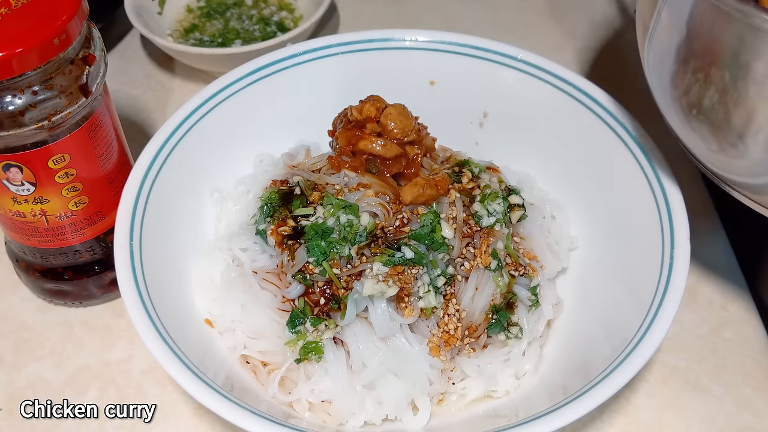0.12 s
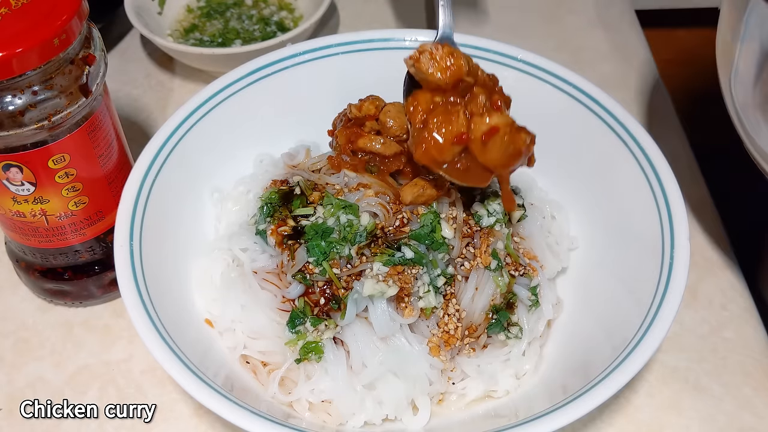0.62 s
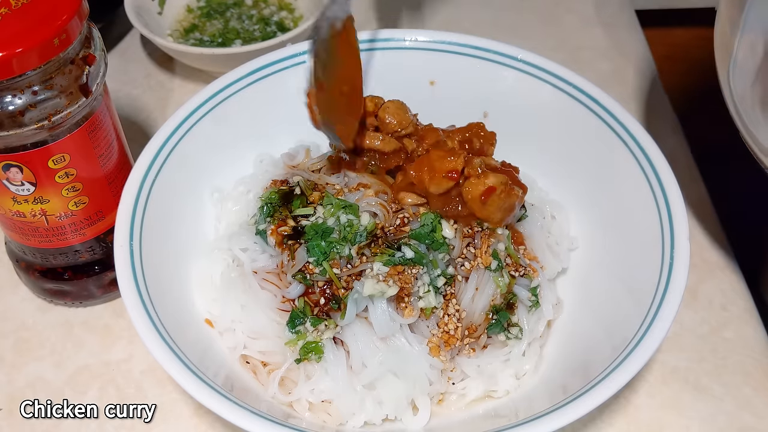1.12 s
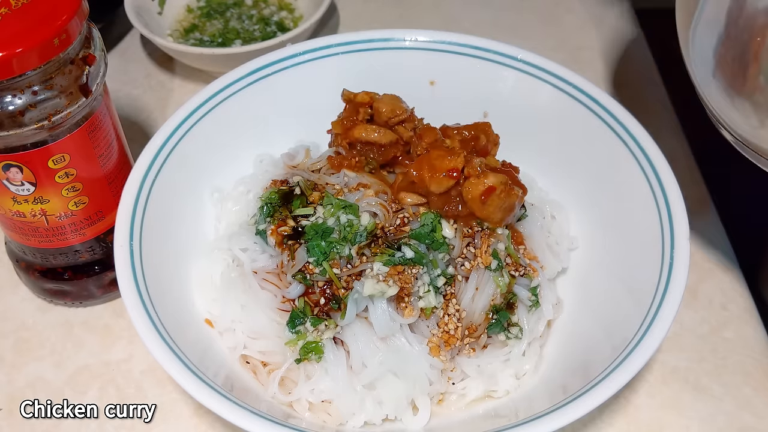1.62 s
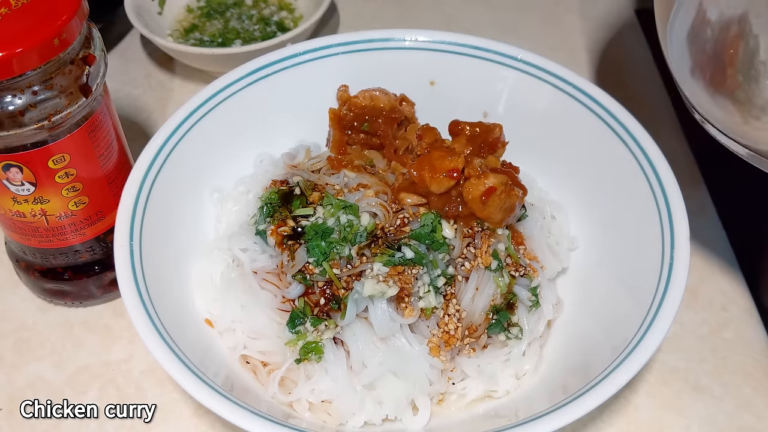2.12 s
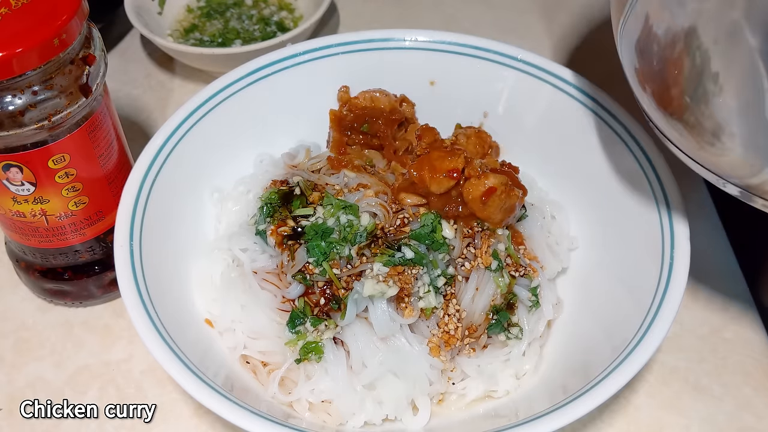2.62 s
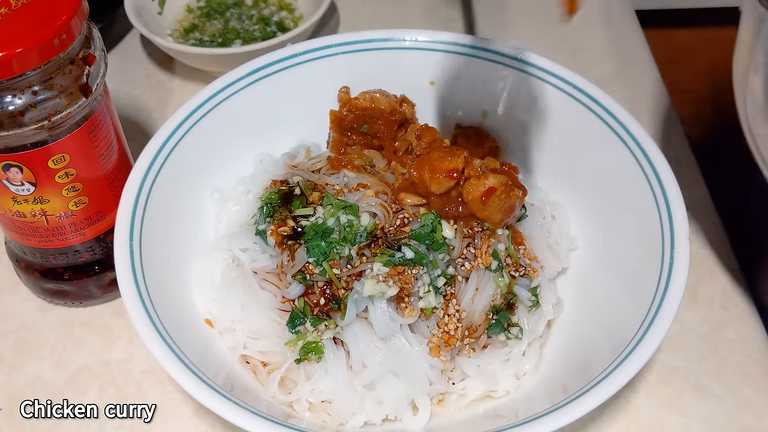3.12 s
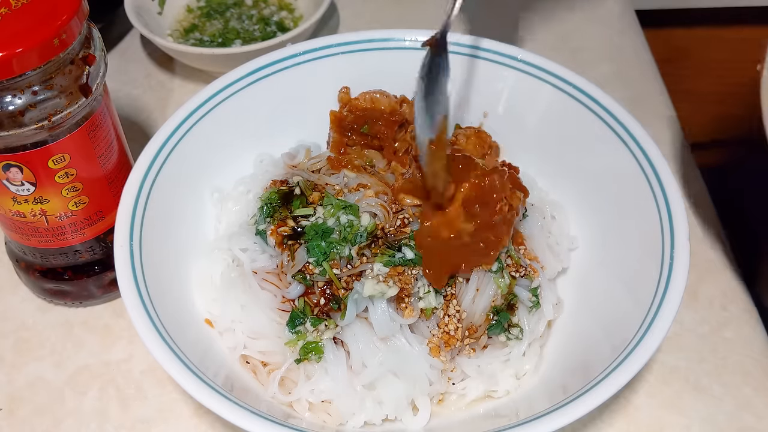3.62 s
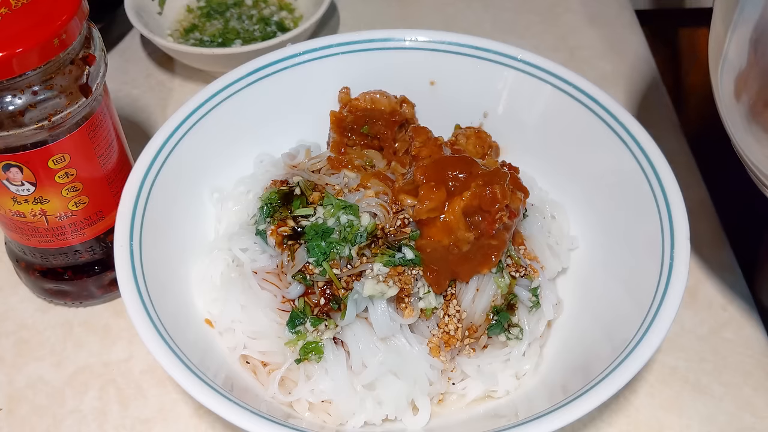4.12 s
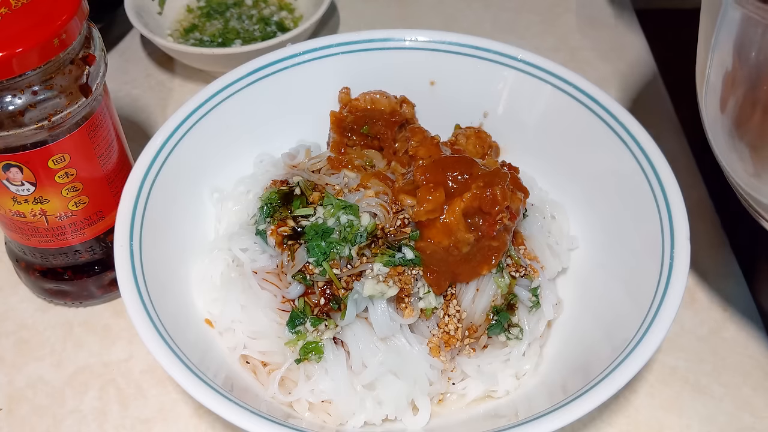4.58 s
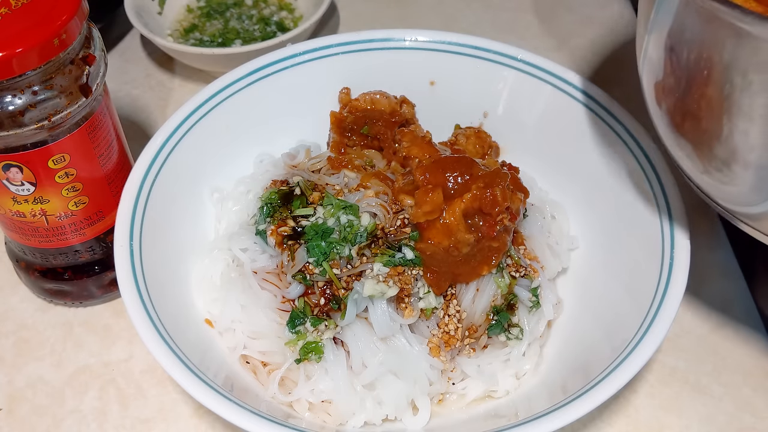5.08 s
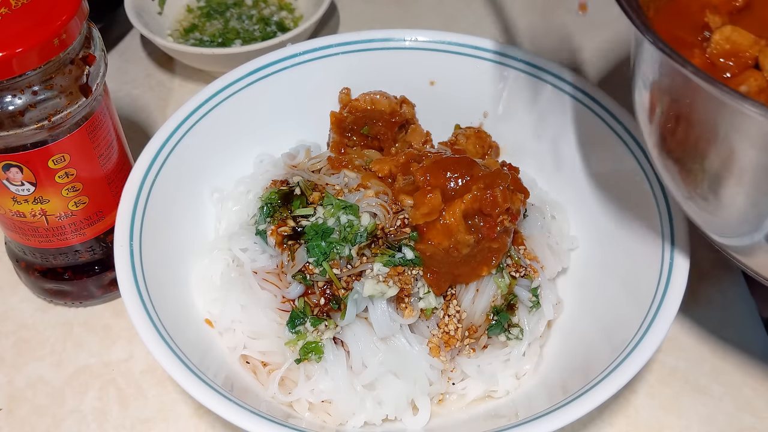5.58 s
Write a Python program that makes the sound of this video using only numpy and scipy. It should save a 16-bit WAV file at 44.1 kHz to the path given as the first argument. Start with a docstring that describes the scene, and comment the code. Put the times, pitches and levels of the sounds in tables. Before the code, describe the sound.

In a small kitchen a quiet extractor fan hums steadily throughout. Faint, crisp ticks of sauce and fingers come irregularly. A steel spoon knocks sharply into a pot of thick stew and scrapes briefly along the bottom; much later a softer knock hits the wall with a fainter scrape. Close stereo microphones, short room reverberation.

```python
"""A small kitchen: an extractor fan hums through its duct while sauce and hands tick faintly.
Twice a steel spoon is knocked into a steel pot of thick stew and dragged along it.
Knocks are decaying sine modes plus clatter; drags are grainy noise in the same modes;
ticks are band-limited snaps with wet fizz; the fan is noise through duct resonances.
Two spaced microphone ports listen."""
import sys
import numpy as np
from scipy import signal
from scipy.fft import rfft, irfft, next_fast_len
from scipy.io import wavfile
from scipy.ndimage import map_coordinates

SR = 44100
rng = np.random.default_rng(int(sys.argv[2]) if len(sys.argv) > 2 else 0)


def gain_from_decibels(decibels):
    """Convert decibel values to linear amplitude factors."""
    exponent = np.asarray(decibels, float) / 20
    return 10 ** exponent


def wav_out(sig):
    """Save sig, one row per channel (or a flat mono array), as 16-bit PCM at SR to the path in sys.argv[1]."""
    wavfile.write(sys.argv[1], SR, np.round(np.clip(np.atleast_2d(sig).T, -1, 1) * 32767).astype(np.int16))


N = 252192

# Modes of pot and spoon, damped by the stew. Each row: frequency in Hz, t60 in s, then relative level in dB
# when struck on the bottom, struck on the wall, rubbed on the bottom, rubbed on the wall.
POT_MODES = [(659.7, 0.045, -38, -59, -26.5, -28), (757, .07, -45.5, -48.5, -26.5, -24),
             (880, 0.05, -36, -55, -27.5, -27), (1393, .035, -29, -55.5, -25, -23),
             (2217.5, 0.14, -29.5, -41.5, -17.5, -19), (2370, 0.062, -42, -44, -15.5, 2.5),
             (2990, .2, -30.5, -39, -9, -1), (3503, 0.1, -25, -59, -11.5, -14),
             (3705, 0.099, -34.5, -50, -7, -6), (3950, .14, -26, -51, -6, -3),
             (4070, .11, -24, -31, -4, -3), (4420, .15, -27, -49, -8, -6),
             (4670, 0.17, -26, -55, -12, -2.5), (5090, 0.1, -31, -45, -13, -7),
             (5226, 0.098, -27.5, -43, -11.5, -4), (6570, .09, -29, -55, -0.5, -9),
             (6880, 0.039, -27, -66, -10, -16), (7040, .09, -23.5, -71, -7.5, -15),
             (7310, 0.0993, -33.5, -51, -1, -5), (7770, .13, -28, -47, -12.5, -11.5),
             (8340, .11, -25.5, -71, -16, -15), (8750, 0.12, -29.5, -70, -15.5, -13.5),
             (9280, 0.2, -38, -47, -11, -7), (10366, .11, -35.5, -48, 1, -6),
             (10880, .1, -26, -53, -4.5, -8), (11100, .1, -26, -58, -10, -12),
             (11500, 0.11, -24, -58, -6, -14), (11500, .09, -26.5, -64, -7, -14),
             (13910, .09, -33.5, -65, -14, -12), (14800, .1, -31.5, -66, -12, -13.5)]
# Kinds of contact, in the order of the level columns above.
CONTACT_KINDS = ["bottom", "wall", "bottom rubbed", "wall rubbed"]


def unit(x):
    """Scaled to rms 1 over all channels together."""
    return x / np.sqrt(np.mean(x ** 2) + 1e-20)


def along(points, hz):
    """Each column of (Hz, ..) points interpolated on a log frequency axis."""
    point_hz, *columns = np.transpose(points)
    return np.squeeze([np.interp(np.log(hz + 1), np.log(point_hz + 1), c) for c in columns])


def filtered(x, response):
    """x times a response of frequency."""
    size = next_fast_len(x.shape[-1] + 8192)
    spectrum = rfft(x, size) * response(np.fft.rfftfreq(size, 1 / SR))
    return irfft(spectrum, size)[..., :x.shape[-1]]


def humps(hz, centre_hz, width_hz, db):
    """Gain of overlapping resonances, added as powers."""
    power = 0
    for c, w, g in zip(centre_hz, width_hz, db):
        power = power + gain_from_decibels(2 * g) / (1 + (2 * (hz - c) / w) ** 2) ** 2
    return np.sqrt(power)


def add(track, sound, s):
    """Mixes a sound into the track at time s, cut at the track's end."""
    part = track[:, round(s * SR):][:, :sound.shape[1]]
    part += sound[:, :part.shape[1]]


def fan():
    """Air noise through duct resonances: alike at both ports in the bass, unrelated in the treble."""
    # Resonances of duct and room. Each row: centre in Hz, width in Hz, relative left and right level in dB.
    duct = [(92, 25, -8, -10), (221.7, 20, -5, -5), (248, 28, -7, 0.5), (288.5, 37, -1.5, 2),
            (337, 23, -3.5, -5), (420, 67, -15, -14.5), (478.4, 25, -22.5, -19.5),
            (636, 25.1, -16.5, -19.5), (768.4, 49, -9, -8), (826, 23, -11, -13), (894, 25, -15.5, -11.5),
            (950, 28, -15, -13), (1010.5, 9.7, -18, -23), (1179.6, 25, -9.5, -13.5),
            (1254, 30.7, -9, -12.5), (1399, 38, -12, -10.5), (1477, 25, -18.5, -21.5),
            (1670, 8.3, -28.5, -26.5), (1778, 32, -13.5, -16.5), (1985, 25, -19, -12),
            (2280, 20, -24.5, -22), (2500, 24.14, -16, -18.5), (2773, 24.97, -18.5, -15.5),
            (3090, 25, -25.5, -19.5), (4700, 33, -22, -25)]
    # Broad rush of air under them. Each row: frequency in Hz, relative left and right level in dB.
    air = [(25, -11, -13.5), (60, -12.5, -11.5), (160, -13.5, -16), (278, -20, -14), (523.7, -23, -23.5),
           (987.4, -17, -16), (2004, -22.5, -23.5), (3400, -29, -29), (5000, -33.5, -35),
           (7000, -39.5, -42.5), (9536, -37.5, -40), (11700, -43, -40), (13000, -42.5, -42),
           (16175, -47, -44)]
    # Likeness of the hum at both ports. Each row: frequency in Hz, shared part of the power (0-1).
    alike = [(60, .93), (160, .78), (260, .97), (350, .93), (450, .55), (1400, .55), (3000, .2),
             (8000, .05)]
    # Phase between the ports. Each row: frequency in Hz, left lead in radians.
    left_lead = [(100, 0), (300, -.45), (520, -.3), (950, 2.7), (1550, 4.5), (1810, 6.3), (4000, 9.5)]
    hum_rms_db = -54.5
    centre_hz, width_hz, *duct_db = np.transpose(duct)
    shared, *own = rng.standard_normal((3, N))

    def colour(f):
        resonances = [humps(f, centre_hz, width_hz, db) for db in duct_db]
        return np.hypot(gain_from_decibels(along(air, f)), resonances)

    def share(f):
        return np.clip(along(alike, f), 0, 1)

    def lead(f):
        return np.exp(.5j * np.outer([1, -1], along(left_lead, f)))

    rush = filtered(shared, lambda f: colour(f) * np.sqrt(share(f)) * lead(f))
    rush += filtered(np.array(own), lambda f: colour(f) * np.sqrt(1 - share(f)))
    return gain_from_decibels(hum_rms_db) * unit(rush)


def ticks():
    """Sauce and finger ticks: one snap in a band, then a faint wet fizz; low ticks are wetter."""
    # Each row: time of the snap in s, snap peak in dB, left-right in dB, centre in Hz, width in octaves.
    tick_rows = [(0.2102, -56, 3, 11500, .25), (.6494, -57, 4, 11000, .25), (.7063, -47, -1.5, 13000, 0.34),
                 (0.7372, -59, 2, 12000, .2), (0.9546, -57, 5, 8000, 0.42), (1.036, -43.5, -1, 11300, 0.12),
                 (1.346, -57, 2, 13000, .3), (2.373, -52.5, 1, 7000, 1.3), (2.8489, -52, 0, 13540, 0.23),
                 (3.4067, -48, 2, 13000, 0.44), (3.441, -60.5, .5, 14000, 0.22),
                 (4.2399, -59.5, 1, 14100, .2), (4.7394, -50.5, -4, 12900, 0.45),
                 (4.799, -48.5, -1.5, 7800, 0.39), (5.1813, -54.5, 2, 4000, 0.38),
                 (5.327, -59, 2, 11050, 0.26), (5.3333, -53, 4, 15000, 0.19), (5.6526, -57, 1, 5000, 0.16)]
    # fizz level at slice start for a -55 dB tick at 10 kHz; share of the tick's dB; tilt with pitch
    fizz_start_db, fizz_follows, fizz_db_per_octave = -69.5, .4, -6
    snap_t60_s, fizz_t60_s = .006, .071
    rise = 64  # samples from slice start to snap
    out, t = np.zeros((2, N)), np.arange(SR // 10) / SR
    for s, db, pan_db, hz, octaves in tick_rows:
        def band(f):
            return np.exp(-.5 * (np.log2((f + 1) / hz) / octaves) ** 2)

        snap = filtered(1. * (np.arange(len(t)) == rise), band)
        fizz = unit(filtered(rng.standard_normal((2, len(t))), band)) * (t > rise / SR)
        fizz_db = fizz_start_db + fizz_follows * (db + 55) + fizz_db_per_octave * np.log2(hz / 10000)
        burst = snap / snap.max() + gain_from_decibels(7.5 - 60 * t / snap_t60_s) * fizz
        tick = gain_from_decibels(db) * burst + gain_from_decibels(fizz_db - 60 * t / fizz_t60_s) * fizz
        add(out, gain_from_decibels(pan_db / 2 * np.array([[1], [-1]])) * tick, s - rise / SR)
    return out


def pot_db(place):
    """Relative level of every mode for one kind of contact."""
    return np.array(POT_MODES)[:, 2 + CONTACT_KINDS.index(place)]


def pot_rustle(place, size, width_hz, between_db):
    """Noise at both ports in the strong modes and in the crowd of small ones between them."""
    # Bands where the noise of knocks and drags is thin, by kind of contact. Each row: centre in Hz, width in Hz.
    thin_bands = {"bottom": [(2500, 260), (3230, 120), (5620, 250)], "wall": [(3400, 120), (6900, 250)]}
    hz, db = np.array(POT_MODES)[:, 0], pot_db(place)

    def thinning(f):
        dips = [1 - .9 / (1 + (2 * (f - c) / w) ** 4) for c, w in thin_bands[place.split()[0]]]
        return np.prod(dips, 0)

    def colour(f):
        strong = humps(f, hz, width_hz + 0.0055 * hz, db)
        crowd = humps(f, hz, 150 + 0.12 * hz, db + between_db)
        return np.hypot(strong, crowd)

    return filtered(rng.standard_normal((2, size)), lambda f: colour(f) * thinning(f))


def blows():
    """Each contact rings the modes and sets off a short clatter; the right port is nearer."""
    # Contacts of the spoon. Each row: start in s, level in dB, kind of contact.
    blow_rows = [(1.779, -0.5, "bottom"), (1.7821, -3.5, "bottom"), (1.7878, -10.5, "bottom"),
                 (1.897, -46, "bottom rubbed"), (4.4732, 0.5, "wall"), (4.4765, -6, "wall")]
    left_lag_s, clatter_t60_s, clatter_rise_s = 0.00019, 0.034, 0.000151
    out, t = np.zeros((2, N)), np.arange(SR // 2) / SR
    hz, t60_s = np.array(POT_MODES)[:, :2, None, None].transpose(1, 0, 2, 3)
    heard_s = np.maximum(t - [[left_lag_s], [0]], 0)
    side = (-1) ** np.arange(len(POT_MODES))[:, None, None]  # neighbouring modes start in opposite directions
    for s, db, place in blow_rows:
        decay = gain_from_decibels(pot_db(place)[:, None, None] - 60 * t / t60_s)
        ring = (side * decay * np.sin(2 * np.pi * hz * heard_s)).sum(0)
        rustle = pot_rustle(place, len(t), width_hz=96, between_db=-10)
        clatter = gain_from_decibels(25.5 - 60 * t / clatter_t60_s) * rustle * (1 - np.exp(-t / clatter_rise_s))
        add(out, gain_from_decibels(db) * (gain_from_decibels(-4.5) * ring + clatter), s)
    return out


def drag():
    """Steel slides on steel through sauce, first over the bottom, then up the wall: grainy noise in the modes."""
    # Strokes after a knock. Each row: start in s, lift-off in s, shudder in dB in pot and in spoon,
    # scrape in dB in pot and in spoon.
    stroke_rows = [(1.821, 1.987, -37.5, -41.5, -52.5, -49), (4.501, 4.646, -52, -58, -57.5, -60)]
    # Decay of the scrape once the spoon leaves the steel, in dB/s: pot, spoon.
    release_db_per_s = [278, 420]
    shudder_db_per_s = 250  # the knock's shudder dies away
    swell_db_per_s = 29.5  # the scrape grows towards lift-off
    spoon_hz = 5800  # pot below, spoon above
    out, t = np.zeros((2, N)), np.arange(N) / SR
    for (start, lift, *db), place, between_db in zip(stroke_rows, CONTACT_KINDS[2:], [-14, -12]):
        shudder = (t > start) * gain_from_decibels(-shudder_db_per_s * np.abs(t - start))
        slope = np.where(t < lift, swell_db_per_s, np.c_[release_db_per_s])
        scrape = (t > start) * gain_from_decibels(-slope * np.abs(t - lift))
        shudder_db, scrape_db = np.reshape(db, (2, 2, 1))
        pot_gain, spoon_gain = np.hypot(gain_from_decibels(shudder_db) * shudder, gain_from_decibels(scrape_db) * scrape)
        # random level, 400 points per second
        grain = gain_from_decibels(1.7 * map_coordinates(rng.standard_normal(N // 50), [t * 400]))
        rustle = grain * pot_rustle(place, N, width_hz=13, between_db=between_db)
        pot = filtered(rustle, lambda f: 1 / (1 + (f / spoon_hz) ** 10))
        out += pot_gain * unit(pot) + spoon_gain * unit(rustle - pot)
    return out


def kitchen(x):
    """Room reverberation: noise in which each frequency dies at its own speed."""
    # Each row: frequency in Hz, t60 in s.
    room_t60 = [(400, 0.37), (2000, 0.27), (4000, 0.18), (8000, 0.22), (15000, 0.051)]
    hz, t, z = signal.stft(rng.standard_normal((2, SR // 2)), SR, nperseg=256)
    decay = gain_from_decibels(-60 * t / along(room_t60, hz)[:, None])
    tail = signal.istft(z * decay, SR, nperseg=256)[1]
    tail = np.pad(tail / np.linalg.norm(tail[0]), ((0, 0), (200, 0)))  # 200 samples of delay
    return signal.fftconvolve(x, tail, axes=1)[:, :N]


def port_colour(near):
    """The two ports colour near sounds differently along frequency."""
    # Each row: frequency in Hz, left-right in dB.
    port_rows = [(600, 5.5), (2000, 3), (4500, 1), (7000, 3.5), (8700, 1), (10000, -0.5), (11500, -11),
                 (14500, -10.5)]
    return filtered(near, lambda f: gain_from_decibels(np.outer([.5, -.5], along(port_rows, f))))


def scene():
    """Near sounds pass the room and the ports' colour; the fan fills the room."""
    near = blows() + drag() + ticks()
    near = near + gain_from_decibels(-10.0) * kitchen(near)
    return port_colour(near) + fan()


def low_pass(x):
    """Removes everything above the highest recorded frequency."""
    return signal.sosfilt(signal.butter(12, 16390, fs=SR, output="sos"), x)


def record(dry):
    """Nothing is kept above the band limit."""
    top_hz = 15870
    mix = filtered(dry, lambda f: f < top_hz)
    return low_pass(mix)


dry = scene()
out = record(dry)
wav_out(out)
```